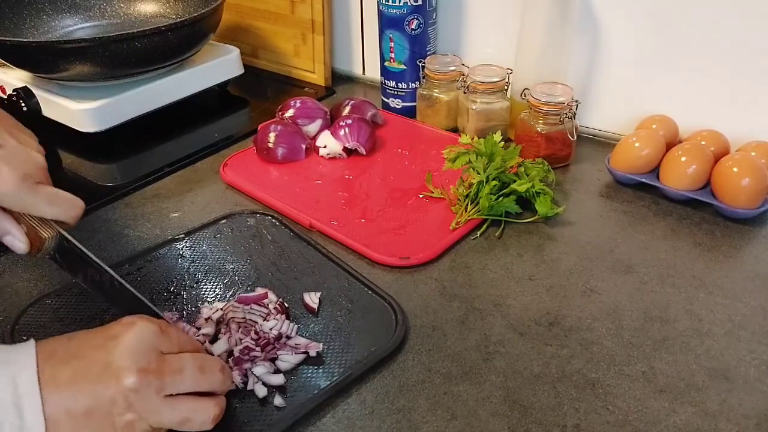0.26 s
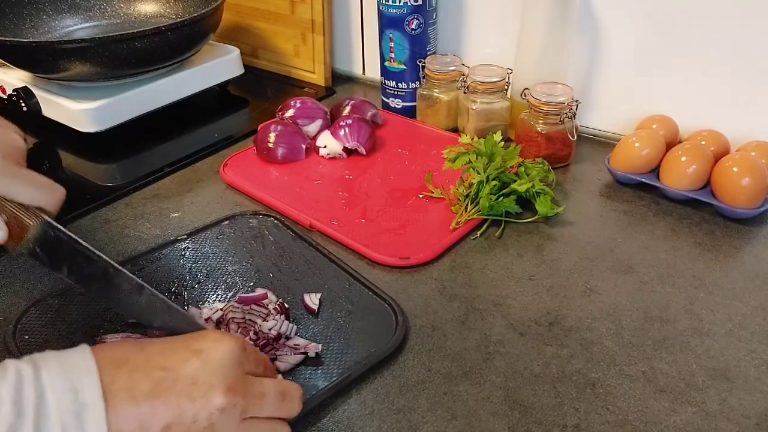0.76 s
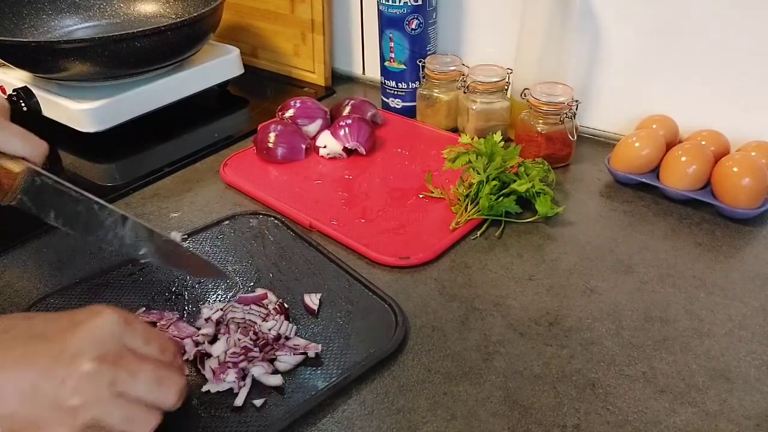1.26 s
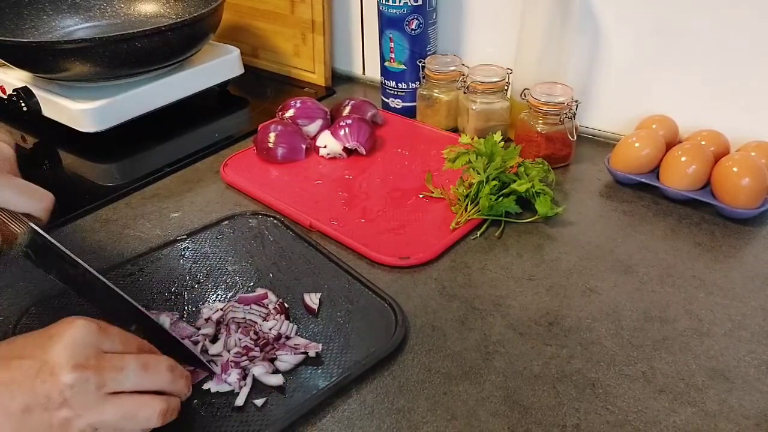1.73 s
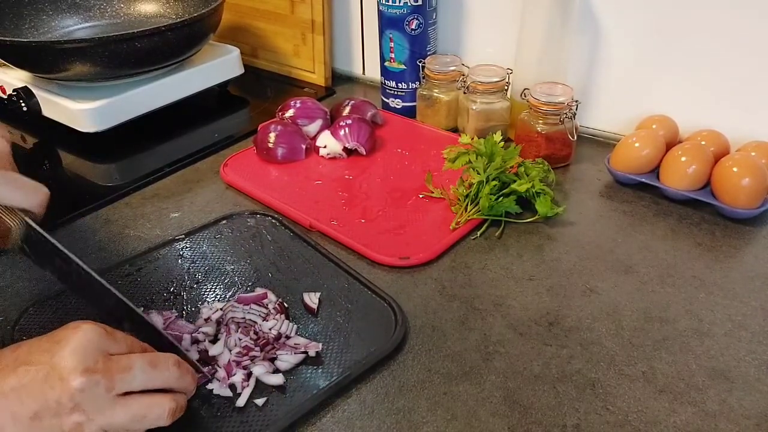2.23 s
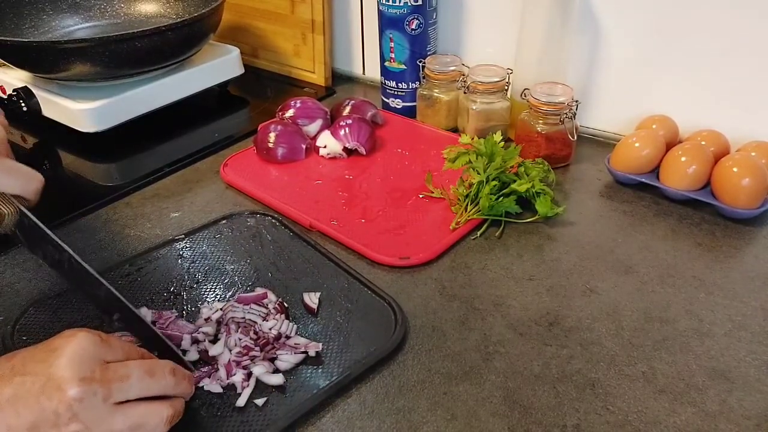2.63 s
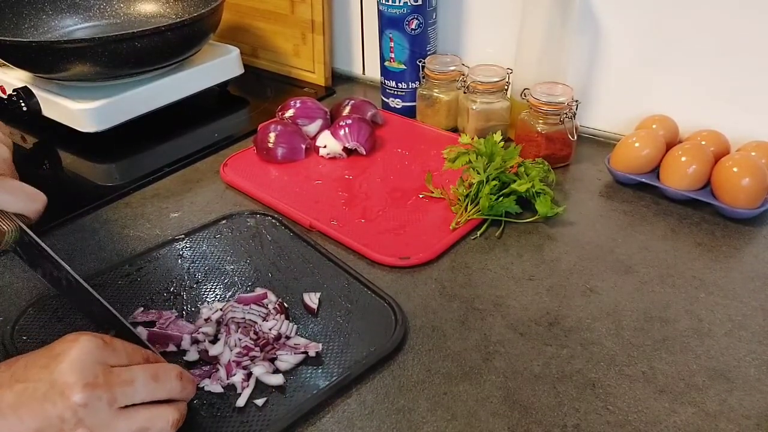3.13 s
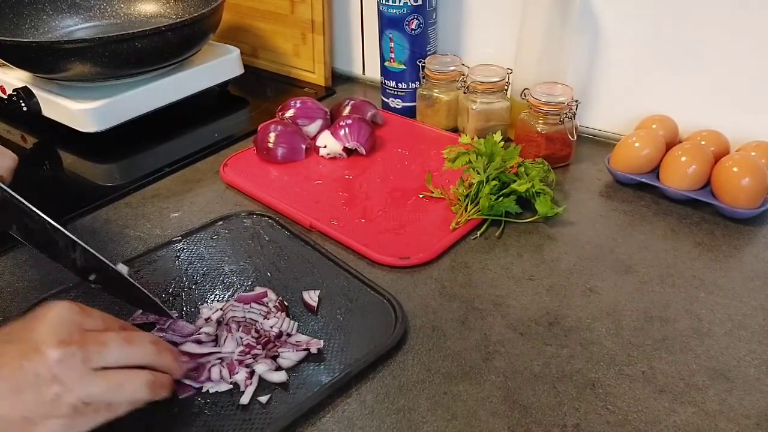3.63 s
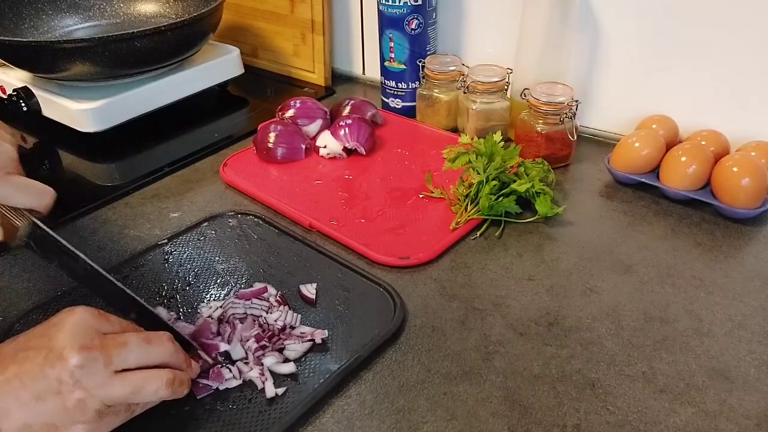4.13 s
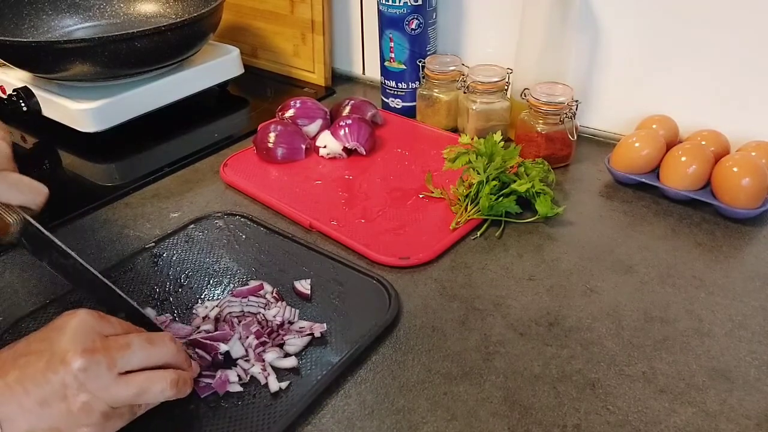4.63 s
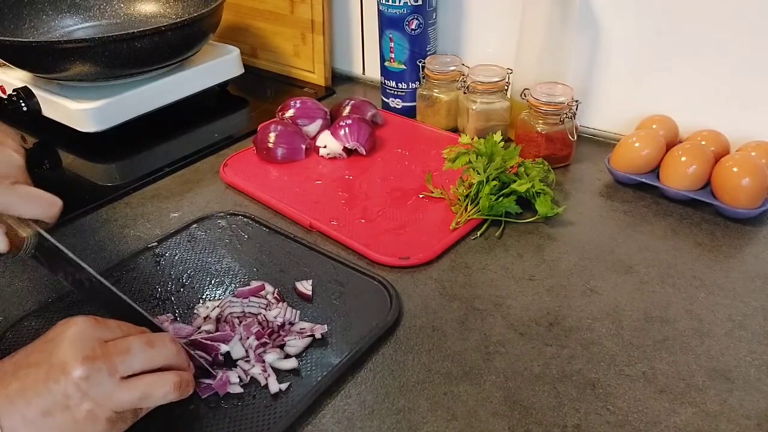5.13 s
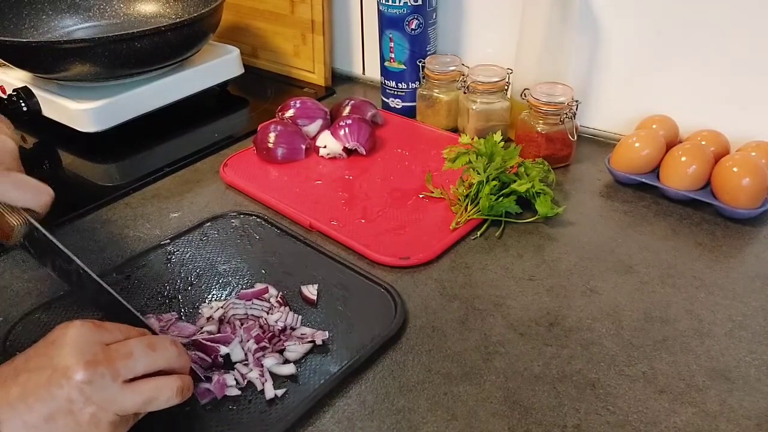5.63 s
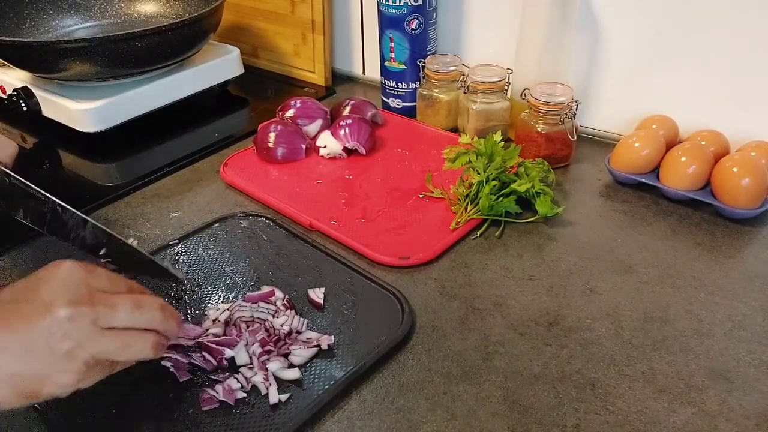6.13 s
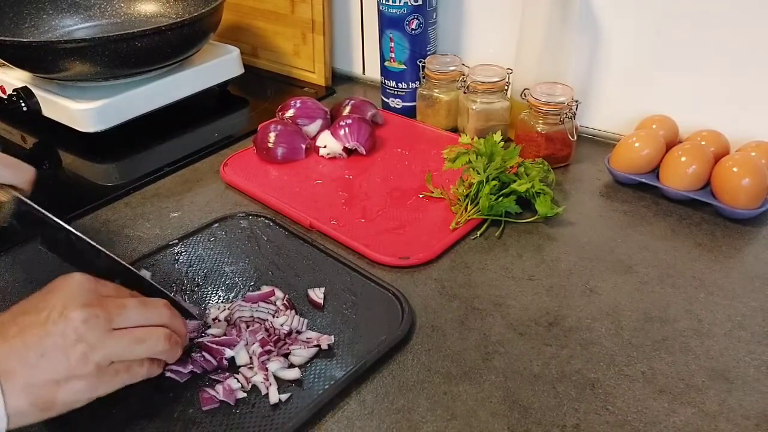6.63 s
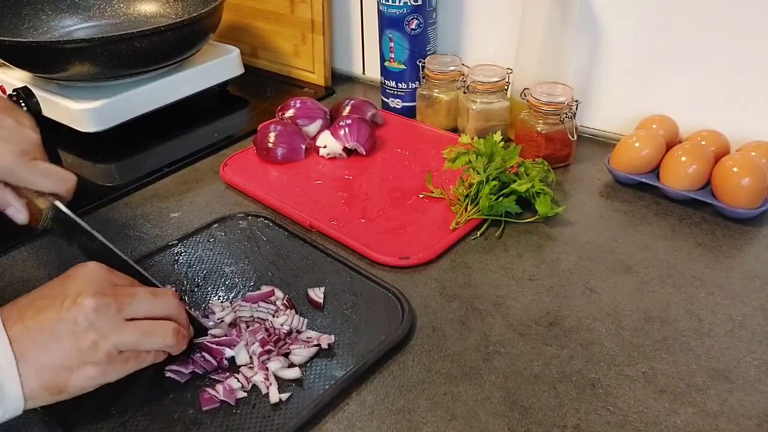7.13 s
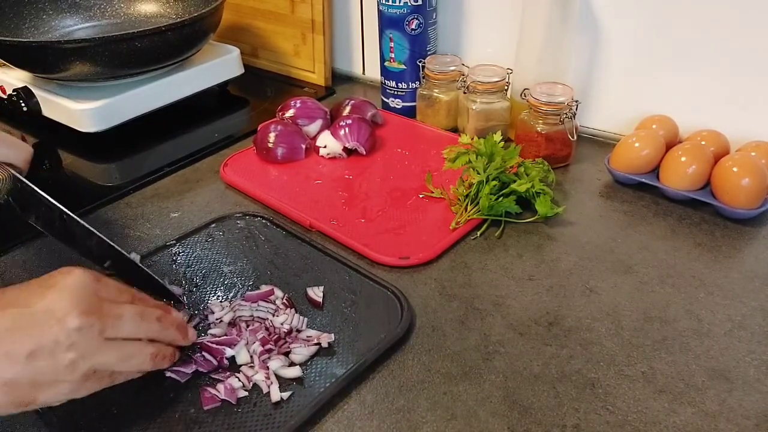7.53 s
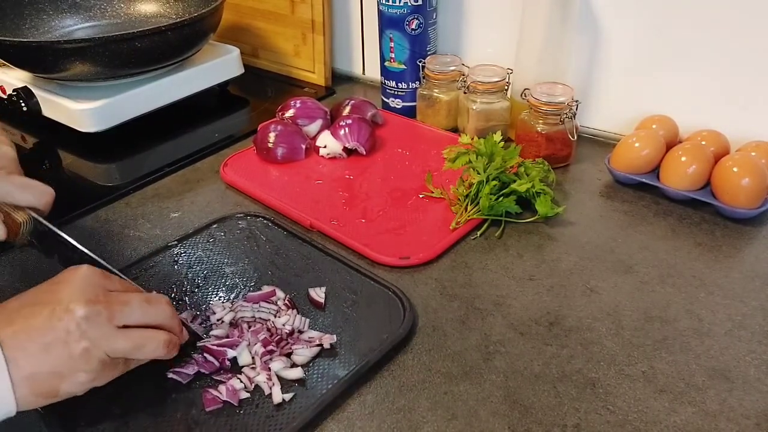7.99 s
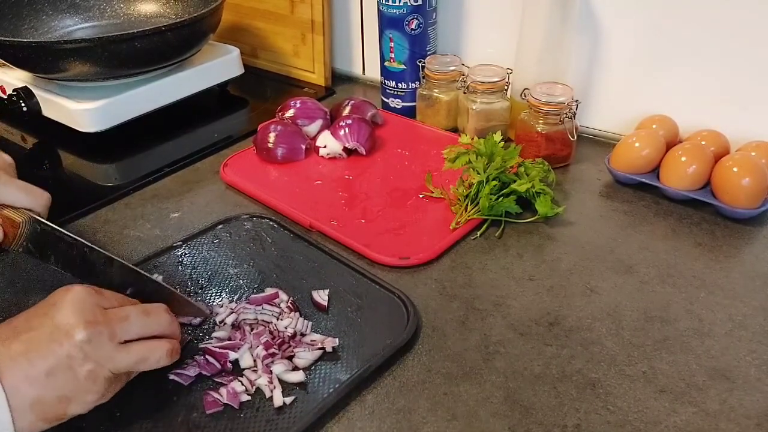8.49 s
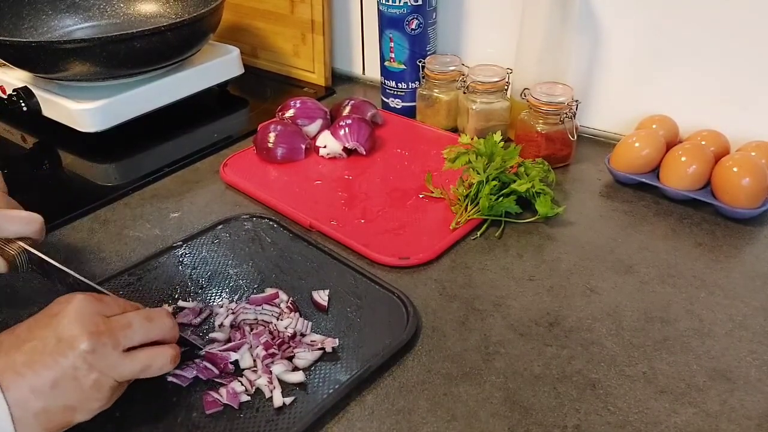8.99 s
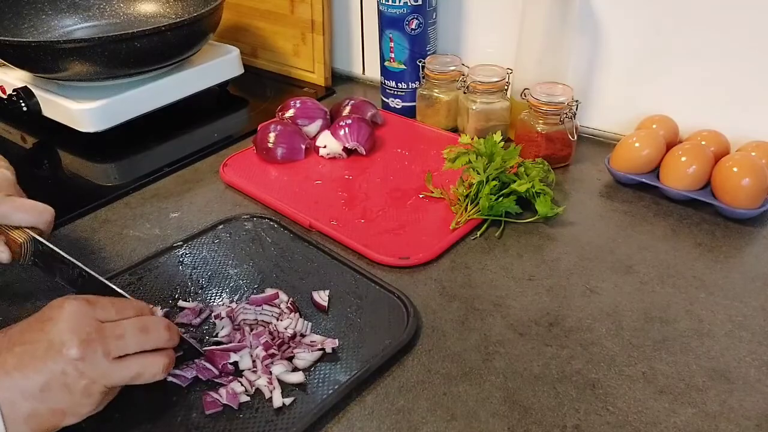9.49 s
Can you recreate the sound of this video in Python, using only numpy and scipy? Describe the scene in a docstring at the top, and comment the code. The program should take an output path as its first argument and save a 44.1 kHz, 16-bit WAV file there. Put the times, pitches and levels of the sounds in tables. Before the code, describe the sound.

Close stereo sound in a small hard kitchen, with short echoes over low rumble, faint airy hiss and barely audible appliance tones. At 0.1-0.25 s a knife crunches through wet onion without a clear knock, then pieces rustle and the edge rasps faintly. Soft shuffles follow until a crackling cut ends in a snap near 1.9. Low pushes come at 2.3 and 2.7, with a strong, sharp plastic knock at 2.8 and a lighter one at 3.1. A mostly crisp tick falls at 4.1, a loud snap and knock at 4.6, a softer knock at 5.1 and a bright hard one at 5.7, followed by a scratchy judder at 5.9. From 6 to 7.8 there are only faint rustles, a rasp and tiny squeaks. Firm hollow knocks land at 7.97 and 8.9, the latter after crackling snaps; a small push and crunch at 9.35 and a rustle finish.

```python
"""Dicing an onion on a plastic board

A knife cuts an onion on a board on a worktop, close to a stereo microphone with two ports.
Pushes are low decaying sines, crunch and rustle are clumps of random clicks, and knocks ring the board.
The blade also rasps in a gliding tone, squeaks and judders. A small hard kitchen adds echoes and a tail.
Filtered noise makes a low rumble and an airy hiss behind it, with faint appliance tones."""
import sys
import numpy as np
from scipy import signal
from scipy.fft import rfft, irfft, next_fast_len
from scipy.io import wavfile

SR = 44100
rng = np.random.default_rng(int(sys.argv[2]) if len(sys.argv) > 2 else 0)


def transcribe(u):
    """Save the signal u as a 16-bit wav file named by the first command-line argument.

    u: samples, shape (n,) or (channels, n), limited to [-1, 1]; the rate is SR.
    q: integer samples, one column per channel.
    """
    v = np.clip(np.atleast_2d(u).T, -1, 1)
    q = np.round(v * 32767).astype(np.int16)
    wavfile.write(sys.argv[1], SR, q)


N = 429975
TIME = np.arange(N) / SR

# strokes of the knife: [meets the onion t/s, is through t/s, push level/dB, slicing level/dB,
# final crunch level/dB]
STROKES = [(0.099, 0.228, -43, -52.5, -37), (1.712, 1.929, -60, -47, -43.5),
           (2.287, 2.34, -27.5, -47, -40.5), (2.705, 2.779, -29, -48.5, -35.5),
           (3.068, 3.095, -30.5, -45, -44.5), (3.85, 4.11, -56.5, -45.5, -33.5),
           (4.454, 4.601, -31, -46, -34.5), (4.999, 5.076, -35.5, -58.5, -37.5),
           (5.56, 5.658, -35.5, -58, -29.5), (7.85, 7.973, -67, -67.5, -32),
           (8.79, 8.909, -62.5, -49.5, -39), (9.351, 9.374, -30.5, -50.5, -47.5)]
# blade meets board: [t/s, level/dB, most excited f/Hz, extra level of upper modes/dB, edge tick level/dB]
# (the tick level is relative to the knock)
BOARD_HITS = [(2.7874, -13, 481, 1.5, 16.5), (3.1005, -21, 600, 3.5, 6.5), (3.246, -45.5, 800, 15, 10),
              (4.1029, -41.5, 800, 8, 31.5), (4.6076, -18, 627, 6, 11), (5.08, -26, 376.6, 2.5, 11.5),
              (5.6709, -16, 506, 9.5, 16), (7.9680, -14, 610, 1, 7.5), (8.9140, -12, 770, -6, 0.5)]
# a tough layer of onion snaps: [t/s, level/dB]
LAYER_SNAPS = [(.2243, -29.5), (.3015, -36), (.4635, -40), (1.9167, -23.5), (2.338, -25), (2.7595, -33),
               (4.0375, -29.5), (4.583, -14), (5.629, -31), (5.650, -27), (7.185, -32), (7.954, -33),
               (8.806, -42), (8.833, -32), (8.882, -25), (9.352, -37), (9.373, -35.5)]
# colour of the sharp edge contact: [f/Hz, relative level per Hz/dB]
TICK_COLOUR = [(100, -25.5), (600, -9.5), (1700, -13.5), (2500, 0.5), (3800, 3.5), (4500, 0), (5300, 3.5),
               (6500, -6), (8200, -6.5), (11000, -11), (16000, -16)]


def amp(db):
    """Turns decibels into gain."""
    return 10 ** (np.asarray(db) / 20)


def unit(x):
    """Scales a sound to rms 1."""
    return x / np.sqrt(np.mean(x ** 2) + 1e-20)


def read(points, hz):
    """Reads a table between its points, along a log-frequency axis."""
    f, value = np.transpose(points)
    return np.interp(np.log(hz + 1), np.log(f + 1), value)


def add(mix, s, sound):
    """Mixes a sound in at time s, cut off at the end of the mix."""
    part = mix[..., round(s * SR):][..., :sound.shape[-1]]
    part += sound[..., :part.shape[-1]]


def colour(x, points, size=4096):
    """Filters with the given spectrum; the filter has unit energy and never sounds before its input."""
    level_db = np.maximum(read(points, abs(np.fft.fftfreq(size, 1 / SR))), -100)
    log_gain = np.log(amp(level_db))
    # the Hilbert transform gives the phase that puts the energy as early as possible
    spectrum = np.exp(np.conj(signal.hilbert(log_gain)))
    taps = np.fft.ifft(spectrum).real[:size // 2]
    return signal.oaconvolve(x, taps / np.linalg.norm(taps))[:len(x)]


def ring(modes, pitch=1):
    """Gives one decaying sine, half a second long, for each way that an object vibrates, as rows."""
    hz, db, t60 = np.transpose(modes)[:, :, None]
    t = TIME[:SR // 2]
    return amp(db - 60 * t / t60) * np.sin(2 * np.pi * hz * pitch * t)


def noise(points, size=2048):
    """Makes steady noise with the given spectrum."""
    return colour(rng.standard_normal(N), points, size)


def wander(per_s):
    """Drifts randomly with about unit size, heading for a new value per_s times a second."""
    knots = rng.standard_normal(size=6000)
    return np.interp(TIME * per_s, np.arange(len(knots)), knots)


def fall(age, fall_s):
    """Gain that holds until age zero, then drops 20 dB in every fall_s."""
    return amp(-20 * np.maximum(age, 0) / fall_s)


def grains(per_s, spread_db):
    """Makes random clicks of either sign: many small, a few large."""
    chance = rng.random(N) * SR / per_s
    at = np.flatnonzero(chance < 1)
    size_db = spread_db * np.minimum(-np.log(chance[at]), 4)
    out = np.zeros(N)
    out[at] = amp(size_db) * (-1) ** at
    return unit(out)


def kitchen(x, early_db, wet_db, left_db, build_s=0.003, size=256):
    """Direct sound at two ports, a few near echoes and a diffuse tail that dies band by band."""
    # fading of the room: [f/Hz, time to fall 60 dB t/s]
    room_t60 = [(100, 0.18), (450, 0.32), (1000, 0.32), (2500, 0.33), (6000, 0.32), (10000, 0.29),
                (16000, 0.26)]
    # echoes from worktop, pan and walls: [delay t/s, level before early_db/dB]
    echo_table = [(.0005, -16.5), (.0022, -15), (.0034, -11.5), (.0067, -14), (.0135, -16.5), (.045, -20.5)]
    lag = round(.00016 * SR)  # the direct sound reaches the right port 0.16 ms after the left
    t = TIME[:SR * 3 // 4]
    hz, frame_s, z = signal.stft(rng.standard_normal((2, len(t))), SR, nperseg=size)
    fade = amp(-60 * frame_s / read(room_t60, hz)[:, None])
    tail = signal.istft(z * fade, SR, nperseg=size)[1][:, :len(t)]
    tail = tail * (1 - np.exp(-(t / build_s) ** 2))
    response = amp(wet_db) * tail / np.linalg.norm(tail, axis=1, keepdims=True)
    response[0, 0] += amp(left_db)
    response[1, lag] += amp(-left_db)
    for k, (s, db) in enumerate(echo_table):
        at, gain = round(s * SR), amp(db + early_db)
        response[0, at] += gain
        response[1, at + 2 * lag * (-1) ** k] += gain  # echoes arrive from alternate sides
    return signal.oaconvolve(x[None], response, axes=1)[:, :N]


def background(hiss_likeness=0.33, waver_db=3.0):
    """Filtered noise: a lumpy rumble common to both ports and an airy hiss that they partly share."""
    # slow changes of level: [t/s, rumble level/dB, hiss level/dB]
    level_table = [(0, -56.5, -62.5), (.7, -67, -66), (2, -65, -68), (3.7, -68, -67.5), (5, -62.5, -67.5),
                   (6.3, -64.5, -71), (7.6, -63, -67.5), (8.6, -72.5, -68.5), (9.75, -67, -64.5)]
    # colours of the two noises: [f/Hz, relative level per Hz/dB]
    rumble_colour = [(10, -64), (30, -30), (48, -8.5), (75, -3), (100, -3.5), (150, -21.5), (300, -27),
                     (800, -61.5)]
    hiss_colour = [(60, -19), (200, -9.5), (310, -3), (450, -8), (750, -9), (1100, -14), (1900, -22.5),
                   (3300, -33), (5400, -33), (16000, -34)]
    s, rumble_db, hiss_db = np.transpose(level_table)
    lumpy_db = np.interp(TIME, s, rumble_db) + waver_db * wander(10)
    rumble = noise(rumble_colour, size=8192) * amp(lumpy_db)
    shared = noise(hiss_colour)
    separate = np.array([noise(hiss_colour), noise(hiss_colour)])
    air = np.sqrt(hiss_likeness) * shared + np.sqrt(1 - hiss_likeness) * separate
    return rumble + air * amp(np.interp(TIME, s, hiss_db))


def thuds(swell_s=.009, low_cut_hz=55, landing_db=-19.5, firm_db=-34, sag_per_db=0.02):
    """Each push of blade or hand sets the worktop swinging; it sounds almost alike at both ports."""
    # ways the worktop swings under a firm push: [f/Hz, level/dB, time to fall 60 dB t/s]
    worktop_modes = [(88, -8.5, 0.52), (109.9, 1, .32), (133.6, -5, .12), (170, -8.5, .09),
                     (212, -13, 0.15), (302, -20.5, 0.33)]
    # a hand leans on the board: [t/s, level/dB]
    lean_table = [(.02, -49.5), (.14, -43), (1.235, -43.5), (5.647, -26)]
    pushes = [(touch, push_db) for touch, _, push_db, _, _ in STROKES]
    # each knock also thuds on the worktop, more softly than the knock itself
    landings = [(s, db + landing_db) for s, db, *_ in BOARD_HITS]
    out = np.zeros(N)
    for s, db in pushes + landings + list(lean_table):
        # pushes softer than firm_db sound lower: a share of the pitch is lost per dB
        pitch = 1 - sag_per_db * np.clip(firm_db - db, 0, 20)
        swing = ring(worktop_modes, pitch).sum(0)
        add(out, s, amp(db) * swing * (1 - np.exp(-TIME[:len(swing)] / swell_s)))
    low_cut = signal.butter(2, low_cut_hz, "high", fs=SR, output="sos")
    return signal.sosfilt(low_cut, out) * amp([[-1], [.5]])  # left and right, in dB


def whines():
    """Faint appliance tones: sines that each repeat the same slight pitch waver from their own start."""
    # the tones: [start t/s, end t/s, f before the slight waver/Hz, level/dB]
    tone_table = [(0.044, 1.35, 1108, -73), (1.401, 3.1, 1555, -83), (2.903, 4.105, 1106, -76),
                  (6.595, 7.955, 308, -70), (7.2, 7.95, 149.8, -66.5)]
    out = np.zeros(N)
    drift = 1 + .008 * wander(35)
    for start, end, hz, db in tone_table:
        turns = np.cumsum(hz * drift[:round((end - start) * SR)]) / SR
        fade = signal.windows.tukey(len(turns), .2)
        add(out, start, amp(db) * np.sin(2 * np.pi * turns) * fade)
    return out


def effort():
    """Strength of crackle and rubbing: cuts build up, crunch through and settle; shoves swell, hold and fade."""
    # blade or fingers shove pieces over the board:
    # [start t/s, length t/s, crackle level/dB, rubbing level/dB]
    shove_table = [(0.298, 0.2, -59, -61.5), (0.92, 0.022, -67, -76), (1.194, 0.13, -73.5, -72),
                   (1.314, 0.068, -63, -64.5), (1.527, 0.25, -77, -75), (1.908, 0.12, -60.5, -61.5),
                   (2.374, 0.089, -58, -62), (3.17, 0.064, -50, -53.5), (3.494, .17, -65.5, -69),
                   (4.094, 0.014, -41, -43), (4.483, 0.033, -48, -56.5), (4.76, 0.052, -59.5, -65),
                   (5.128, 0.08, -47.5, -55), (5.29, 0.28, -66.5, -70), (5.764, 0.14, -54, -60),
                   (6.196, 0.096, -80.5, -85), (6.303, 0.12, -68.5, -64.5), (6.521, 0.11, -78, -81.5),
                   (6.753, 0.036, -69.5, -78), (6.83, 0.051, -61, -77), (7.04, 0.087, -63, -76.5),
                   (7.141, 0.17, -56, -61.5), (7.61, .02, -87, -71), (8, 0.063, -53, -55.5),
                   (8.221, 0.13, -69, -91), (8.387, 0.024, -62, -81.5), (9.121, 0.028, -57, -63.5),
                   (9.37, 0.065, -58, -62), (9.583, 0.05, -55.5, -61.5)]
    bite_s = .025  # time for the edge to sink into the skin
    build_db_per_s = 96.5  # slicing grows as more of the blade enters the onion
    crunch_rise_s, crunch_fall_s = 0.018, 0.027  # time for 20 dB, as the last layers give way
    settle_db, settle_s = -15, .17  # the pieces fall apart: level against the crunch, time for 20 dB
    cut_rub_db = -9.5  # rubbing on the board, against the crackle of a cut
    shove_attack_s, shove_release_s = 0.036, 0.075  # time to full speed, time to fall 20 dB
    tear_db, tear_s = -15.5, 0.016  # crackle after a snap: level against the snap, time for 20 dB
    t = TIME[::44]  # steps of about 1 ms
    crackle, rubbing = [], []
    for touch, through, _, slice_db, crunch_db in STROKES:
        slicing = amp(slice_db - build_db_per_s * np.maximum(through - t, 0))
        crunch = amp(crunch_db) * fall(through - t, crunch_rise_s)
        settling = amp(crunch_db + settle_db) * (t > through) * fall(t - through, settle_s)
        in_onion = np.hypot(slicing, crunch) * fall(t - through, crunch_fall_s)
        cut = np.clip((t - touch) / bite_s, 0, 1) * np.hypot(in_onion, settling)
        crackle.append(cut)
        rubbing.append(amp(cut_rub_db) * cut)
    for start, length, crackle_db, rub_db in shove_table:
        attack = np.clip((t - start) / shove_attack_s, 0, 1)
        speed = attack * fall(t - start - length, shove_release_s)
        crackle.append(amp(crackle_db) * speed)
        rubbing.append(amp(rub_db) * speed)
    for s, db in LAYER_SNAPS:
        crackle.append(amp(db + tear_db) * (t > s) * fall(t - s, tear_s))
    # overlapping efforts add up by power
    return [np.interp(TIME, t, np.linalg.norm(parts, axis=0)) for parts in (crackle, rubbing)]


def cutting(clump_db=3.5, clumps_per_s=170, snap_gain_db=9, rub_gain_db=1.0):
    """Cells burst in clumps of crackle under the blade, which also rubs the textured board."""
    # colours of wet onion and of rubbing: [f/Hz, relative level per Hz/dB]
    crunch_colour = [(400, -24), (1500, -13.5), (2300, -7.5), (3200, -8.5), (4300, -3.5), (5100, 1),
                     (6500, -6.5), (8200, -0.5), (10300, -3.5), (12400, -5), (16000, -5)]
    rub_colour = [(150, -11.5), (400, -3), (600, -7), (780, -4), (1000, -13.5), (1700, -17), (2400, -8.5),
                  (3300, -13.5), (4500, -15), (9000, -31.5)]
    burst, friction = effort()
    snaps = np.zeros(N)
    for s, db in LAYER_SNAPS:
        add(snaps, s, amp([db + snap_gain_db]))  # a single click
    clumps = amp(clump_db * wander(clumps_per_s))
    crackle = burst * unit(grains(per_s=2000, spread_db=2.5) * clumps)
    rub = amp(rub_gain_db) * friction * grains(per_s=2000, spread_db=1)
    return (kitchen(colour(crackle + snaps, crunch_colour), early_db=1.5, wet_db=-4, left_db=1.5)
            + kitchen(colour(rub, rub_colour), early_db=-2.5, wet_db=0, left_db=0.5))


def draws(uneven=.13, catches_per_s=380, slow=.5, attack_s=0.0077):
    """The edge catches on the board's ridges: a hollow rasp whose pitch and level follow its speed."""
    # the edge is drawn over the ridges: [start t/s, length t/s, level/dB, pitch at full speed f/Hz]
    draw_table = [(0.372, 0.2, -58, 760), (1.908, .19, -61, 842), (2.42, 0.16, -60.5, 792),
                  (5.142, .2, -59.5, 820), (7.078, .31, -58.5, 870)]
    out = np.zeros(N)
    for start, length, db, top_hz in draw_table:
        t = TIME[:round(length * SR)]
        # speed rises and falls in one arch; slow is its share of full speed at both ends
        speed = slow + (1 - slow) * np.sin(np.pi * t / length)
        hz = top_hz * speed * (1 + uneven * wander(400)[:len(t)])
        turns = np.cumsum(hz) / SR
        rasp = unit(np.sin(2 * np.pi * turns) * wander(catches_per_s)[:len(t)])
        fade = np.minimum(np.minimum(t, length - t) / attack_s, 1)
        add(out, start, amp(db) * speed * rasp * fade)
    return kitchen(out, early_db=-11, wet_db=-4.5, left_db=-0.5)


def squeaks(length_s=0.043):
    """Wet onion squeaks on the steel now and then: short swelling tones of unsteady pitch."""
    # the squeaks: [start t/s, level/dB, middle pitch f/Hz]
    squeak_table = [(.94, -69, 2800), (1.54, -70, 3210), (2.55, -63, 3250), (5.48, -73, 3350),
                    (7.545, -71, 3220), (8.533, -75.5, 3210)]
    out = np.zeros(N)
    swell = signal.windows.hann(round(length_s * SR))
    for s, db, hz in squeak_table:
        pitch = hz * (1 + 0.045 * wander(240)[:len(swell)])
        add(out, s, amp(db) * swell * np.sin(2 * np.pi * np.cumsum(pitch) / SR))
    return kitchen(out, early_db=3.5, wet_db=-5, left_db=1)


def knocks(focus_db=6, focus_octaves=.45, upper_hz=1800, slap_db=19.5, low_cut_hz=130, bite_s=0.0015):
    """The edge bites into the plastic and slaps it down; the spot it hits decides which modes ring most."""
    # ways the board rings on the worktop: [f/Hz, level/dB, time to fall 60 dB t/s]
    board_modes = [(236, -18.5, 0.16), (309.7, -10, 0.16), (390, -8, .04), (440.7, -13, 0.25),
                   (460, -3.5, 0.069), (534.7, -2, 0.052), (589, -7, 0.069), (661, -10, 0.064),
                   (717, -2.5, 0.061), (751.4, -1.5, .045), (773.6, 1, 0.077), (879, -5, 0.095),
                   (940, -15.5, 0.014), (1036, -16, 0.036), (1181, -6.5, 0.088), (1350, -13.5, 0.019),
                   (1570, -17.5, .015), (2000, -16.5, .015), (2064, -6, 0.045), (2296, -9.5, .03),
                   (2506, -11, 0.033), (2720, -7.5, 0.027), (2870, -11, 0.0062), (2980, -10.5, 0.019),
                   (3040, -12.5, 0.014)]
    # colour of the board slapping the worktop: [f/Hz, relative level per Hz/dB]
    slap_colour = [(40, -39), (130, -14), (220, -5.5), (270, -15.5), (340, -5.5), (480, 2.5), (820, 1),
                   (1050, -9), (1300, -7), (1700, -19), (2400, -8), (4000, -19.5), (16000, -51.5)]
    body, slap, tick, grit = np.zeros((4, N))
    hz, modes = np.transpose(board_modes)[0], ring(board_modes)
    polarity = (-1) ** (np.arange(len(hz)) // 2)  # neighbouring mode pairs swing in opposite senses
    fade = np.exp(-TIME[:SR // 100] / bite_s)
    for s, db, spot_hz, upper_db, tick_db in BOARD_HITS:
        near = np.exp(-(np.log2(hz / spot_hz) / focus_octaves) ** 2)
        mode_db = db + focus_db * (near - 1.5) + upper_db * (hz > upper_hz)
        add(body, s, (polarity * amp(mode_db)) @ modes)
        add(slap, s, amp([db + slap_db]))
        # a sharp contact, then a brief gritty bite
        add(tick, s, amp([db + tick_db - 7.5]))
        bite = fade * rng.standard_normal(len(fade))
        add(grit, s, amp(db + tick_db + 0.5) * bite / np.linalg.norm(bite))
    # the lowest bass is taken out of the ringing and the slap
    low_cut = signal.butter(2, low_cut_hz, "high", fs=SR, output="sos")
    body = signal.sosfilt(low_cut, body + colour(slap, slap_colour))
    return (kitchen(body, early_db=0.5, wet_db=-3.5, left_db=-0.5)
            + kitchen(colour(tick, TICK_COLOUR), early_db=1.5, wet_db=0.5, left_db=3.5)
            + kitchen(colour(grit, TICK_COLOUR), early_db=0.5, wet_db=-15, left_db=1.5))


def judder(start_s=5.862, level_db=-34, attack_s=.005, fall_s=.055, scratch_db=-3):
    """The edge twists on the board: quick uneven slips scratch and ring the blade and board."""
    # ways blade and board ring: [f/Hz, level/dB, time to fall 60 dB t/s]
    blade_modes = [(651, -9.5, 0.043), (875, 1, 0.068), (940, 1.5, 0.017), (2273, 3.5, 0.013),
                   (3420, 10, .006), (4190, 10.5, 0.0051), (4680, -2.5, 0.00221)]
    age = TIME - start_s
    twist = np.clip(age / attack_s, 0, 1) * fall(age - attack_s, fall_s)  # fall_s is the time for 20 dB
    slips = grains(per_s=1500, spread_db=3) * amp(level_db) * twist
    body = ring(blade_modes).sum(0)
    ringing = signal.oaconvolve(slips, body / np.linalg.norm(body))[:N]
    scratch = amp(scratch_db) * colour(slips, TICK_COLOUR)
    return kitchen(ringing + scratch, early_db=3.5, wet_db=-5, left_db=1)


def scene():
    """Adds up all sources at the microphone."""
    return background() + thuds() + whines() + cutting() + draws() + squeaks() + knocks() + judder()


def record(dry, edge_hz=15900):
    """The two microphone ports colour the sound differently; then the highest treble is cut off."""
    # loudness of the ports: [f/Hz, left minus right level/dB]
    balance_table = [(100, -1), (300, 2), (1000, 0.5), (2200, 3.5), (3500, 1), (6000, 2.5), (8500, 0),
                     (12000, -3), (16000, -3.5)]
    # extra lead of the left port: [f/Hz, phase/rad]
    phase_table = [(500, 0.19), (1100, 0.71), (2000, 0.057)]
    size = next_fast_len(N + SR // 10)
    hz = np.fft.rfftfreq(size, 1 / SR)
    # each port takes half of the difference
    left = amp(read(balance_table, hz) / 2) * np.exp(.5j * read(phase_table, hz))
    heard = irfft(rfft(dry, size) * np.array([left, 1 / left]), size)[:, :N]
    treble_cut = signal.firwin(511, edge_hz, window=("kaiser", 9), fs=SR)
    return signal.oaconvolve(heard, treble_cut[None], "same")


dry = scene()
out = record(dry)
transcribe(out)
```